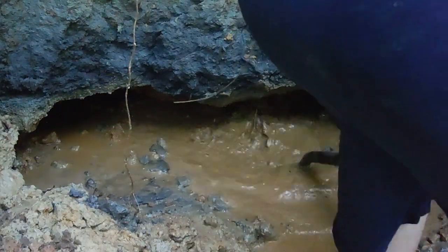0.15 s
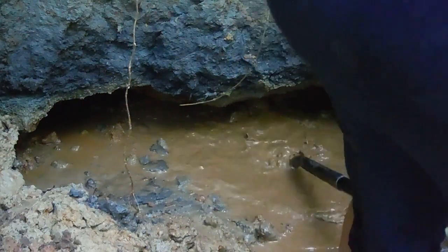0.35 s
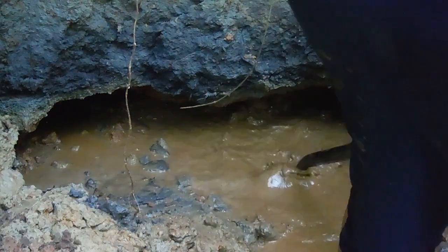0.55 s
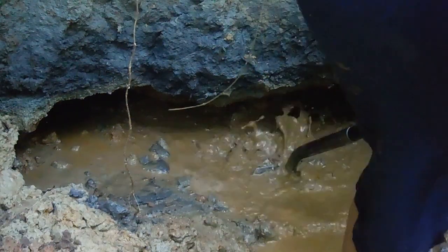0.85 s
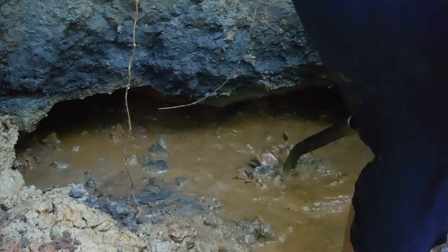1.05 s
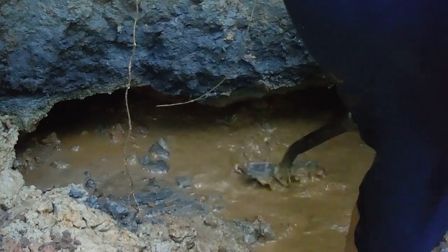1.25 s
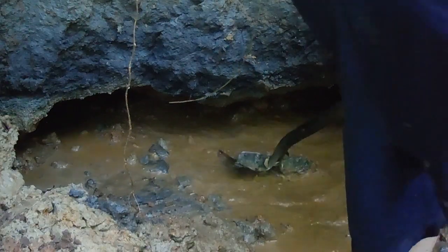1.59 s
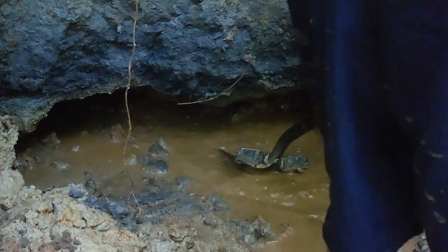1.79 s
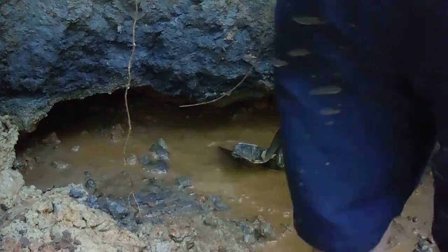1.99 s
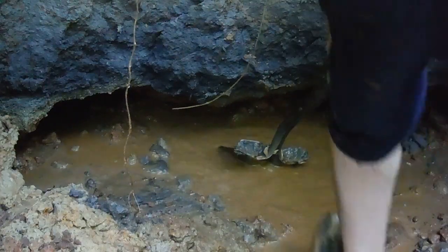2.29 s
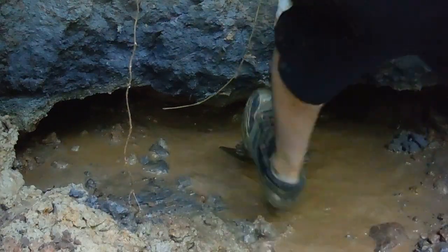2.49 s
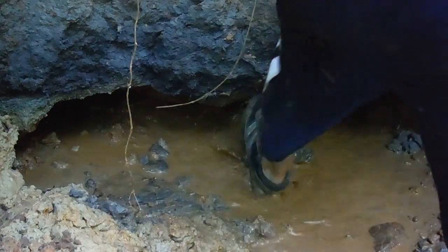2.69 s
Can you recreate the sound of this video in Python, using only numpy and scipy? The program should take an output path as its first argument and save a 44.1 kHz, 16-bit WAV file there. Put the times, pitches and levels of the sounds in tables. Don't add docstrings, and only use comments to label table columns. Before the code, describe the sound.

Close splashing in shallow muddy water, with dull knocks, trickling and a distant puttering pump engine

```python
import sys
import numpy as np
from scipy import signal
from scipy.io import wavfile
from scipy.ndimage import uniform_filter1d

SR = 44100
rng = np.random.default_rng(int(sys.argv[2]) if len(sys.argv) > 2 else 0)


def to_wav(s):
    ch = np.atleast_2d(s).T
    pcm = np.round(np.clip(ch, -1, 1) * 32767)
    wavfile.write(sys.argv[1], SR, pcm.astype(np.int16))


def rack_gain(trim_db):
    fader = np.asarray(trim_db, float)
    return 10 ** (fader / 20)


N = 125244


def rms_one(x):
    return x / np.sqrt(np.mean(x ** 2) + 1e-20)


def in_time(rows):
    return np.interp(np.arange(N) / SR, *np.transpose(rows))


def drift(rate_hz):
    r = np.exp(-2 * np.pi * rate_hz * 40 / SR)
    slow = signal.lfilter([1], [1, -2 * r, r * r], rng.standard_normal(N // 40 + 2002))
    slow = rms_one(slow[2000:])
    return np.interp(np.arange(N) / 40, np.arange(len(slow)), slow)


def ring(clicks, hz, t60_s):
    r = rack_gain(-60 / (t60_s * SR))
    w = 2 * np.pi * hz / SR
    return signal.lfilter([0, np.sin(w)], [1, -2 * r * np.cos(w), r * r], clicks + 1e-18)


def cut(x, hz, kind, order=2):
    return signal.sosfilt(signal.butter(order, hz, kind, fs=SR, output="sos"), x)


def grains(per_s, size_db):
    size = rack_gain(size_db * np.minimum(rng.exponential(1, N), 5)) * rng.choice([-1, 1], N)
    return size * (rng.random(N) < per_s / SR)


def rumble():
    air = rms_one(cut(rng.standard_normal(N), [30, 90], "band"))
    return rack_gain(-57 + 4.0 * drift(5.3)) * air


def exhaust(turns):
    # pitch_hz, level_db, t60_s
    exhaust_modes = [(140.6, -15, 0.087), (226.8, -22.5, 0.17), (459, -32, 0.15), (498, -18, 0.034),
                     (584, -27.5, 0.082), (379, -31, 0.043)]
    fires_at, spread_db, upper_lag_s = 0.25, 0.3, 0.003985
    lead = SR // 2
    firings = np.flatnonzero(np.diff(np.floor(turns + 1 - fires_at)))
    earlier = firings[0] - (firings[1] - firings[0]) * np.arange(1, 9)
    firings = np.r_[earlier, firings] + lead
    out = 0
    for k, (hz, db, t60_s) in enumerate(exhaust_modes):
        lag = int(upper_lag_s * SR) * (hz > 300)
        strength_db = spread_db * (4 + k / 2) * rng.standard_normal(len(firings))
        clicks = np.zeros(N + lead)
        clicks[np.minimum(firings + lag, N + lead - 1)] = -rack_gain(db + strength_db)
        out = out + ring(clicks, hz, t60_s)
    high_pass = signal.butter(3, 86.5, "high", fs=SR, output="sos")
    return signal.sosfiltfilt(high_pass, out)[lead:]


def valve(turns, firings_per_s):
    valve_at, tick_db, spread_db, fade_s = 0.63, -15.5, 5.2, 0.003
    since_s = ((turns - valve_at) % 1) / firings_per_s
    strength = rng.standard_normal(int(turns[-1]) + 2)
    strength = strength[np.floor(turns + 1 - valve_at).astype(int)]
    tick = rack_gain(tick_db + spread_db * strength) * np.exp(-since_s / fade_s)
    return tick * cut(rng.standard_normal(N), [3000, 8800], "band", order=3)


def engine():
    # start_s, firings_per_s
    speed_curve = [(0.0, 25.026), (0.22, 24.99), (0.44, 25.307), (0.66, 25.255), (0.87, 24.482),
                   (1.09, 24.331), (1.31, 24.681), (1.53, 25.492), (1.75, 24.493), (1.97, 24.902),
                   (2.18, 24.848), (2.4, 24.906), (2.62, 25.099), (2.84, 25.081)]
    # start_s, level_db
    load_curve = [
        (0, -0.5),
        (.6, 1),
        (1.4, 0.5),
        (2.3, -2.5),
        (2.84, 3),
    ]
    firings_per_s = in_time(speed_curve)
    turns = np.cumsum(firings_per_s) / SR
    shake = rack_gain(-33.5) * np.sin(4 * np.pi * (turns - 0.34))
    shake = shake + rack_gain(-48) * np.sin(2 * np.pi * turns)
    return rack_gain(in_time(load_curve)) * (exhaust(turns) + shake) + valve(turns, firings_per_s)


def trickle():
    # start_s, level_db
    flow_curve = [(0, -17.5), (.15, -17), (.33, -16), (.45, -15), (.62, -15), (.75, -17), (1.1, -16.5),
                  (1.2, -14), (1.33, -17), (1.6, -15.5), (1.8, -18.5), (1.97, -16.5), (2.1, -16),
                  (2.25, -18.5), (2.45, -20.5), (2.54, -18.5), (2.7, -12.5), (2.84, -15)]
    # band_hz, level_db (per Hz)
    trickle_colour = [(200, -7), (320, -12.5), (480, -1), (700, -16), (840, -4), (1000, -8), (3000, -8.5),
                      (9000, -9)]
    patchy_db, fizz_db, fizz_per_s, fizz_size_db, fizz_cycles = 0.88, -6, 900, 2.6, 9
    colour_hz, colour_db = np.transpose(trickle_colour)

    def colour(hz):
        return np.interp(np.log(hz), np.log(colour_hz), colour_db)

    wash = 0
    together = drift(14)
    band_edges = 200 * 2 ** np.arange(0, 6.5, 1 / 3)
    white = rng.standard_normal((2, N))
    for k, (low, high) in enumerate(zip(band_edges, band_edges[1:])):
        patches_db = patchy_db * (0.5 * together + drift(54))
        band = cut(white[k % 2], [low, high], "band")
        wash = wash + rack_gain(colour(np.sqrt(low * high)) + patches_db) * band

    clicks = grains(fizz_per_s * rack_gain(4.3 * together), fizz_size_db)
    dealt = rng.integers(0, 20, N)
    fizz = 0
    for k, hz in enumerate(np.geomspace(600, 9500, 20)):
        fizz = fizz + rack_gain(colour(hz)) * hz * ring(clicks * (dealt == k), hz, fizz_cycles / hz)
    water = rms_one(wash) + rack_gain(fizz_db) * rms_one(fizz)
    return rack_gain(in_time(flow_curve)) * cut(water, 9630, "low", order=4)


def drops():
    # start_s, level_db (peak)
    drop_rows = [(0.124, -3), (0.383, -4), (0.6493, -5), (0.9561, -4.5), (1.0719, -2), (1.091, -8),
                 (1.3507, -23), (1.3786, -10), (1.4405, -11), (1.667, -6), (1.95, -19), (2.1363, -1),
                 (2.224, -16), (2.2337, -12), (2.336, -6), (2.4004, -5.5), (2.475, -10), (2.65, -7),
                 (2.7022, -5), (2.7351, -2)]
    out = np.zeros(N)
    fade = np.exp(-np.arange(800) / SR / 0.0043)
    for start_s, db in drop_rows:
        i = int(start_s * SR)
        tick = cut(fade * rng.standard_normal(800), [3000, 9500], "band", order=3)
        out[i:i + 800] += rack_gain(db - 1) * tick
    return out


def knocks():
    # start_s, level_db, pitch_hz
    knock_rows = [(.49, -24, 320), (.565, -24, 180), (.68, -26, 70), (.685, -22, 170), (1.002, -23, 70),
                  (1.008, -13, 135), (1.012, -19, 300), (1.262, -35, 90), (1.272, -19, 610),
                  (1.272, -22, 290), (1.543, -29, 70), (1.907, -22, 340), (2.612, -19, 65),
                  (2.611, -14, 200), (2.616, -9, 150), (2.622, -12, 240), (2.626, -11, 360),
                  (2.638, -13, 380), (2.685, -29, 60)]
    trim_db, fade_cycles = 6.5, 1.03
    out = np.zeros(N + SR)
    u = np.arange(SR // 10) / SR
    for start_s, db, hz in knock_rows:
        i = int(start_s * SR)
        push = 2 * np.sin(2 * np.pi * hz * u) * u * hz * np.exp(-u * hz / fade_cycles)
        out[i:i + len(u)] += rack_gain(db + trim_db) * push
    return out[:N]


def pockets():
    # middle_s, half_length_s, level_db, pitch_hz
    pocket_rows = [(.4, 0.0055, -18, 3250), (.165, .012, -30, 370), (0.202, 0.0097, -24, 1700),
                   (0.267, 0.0091, -17.5, 1777), (.268, 0.0091, -21, 860), (.635, .03, -24, 480),
                   (.66, 0.011, -20, 1240), (.668, 0.025, -20, 2700), (0.698, 0.011, -21.5, 610),
                   (1, .016, -20.5, 860), (0.91, 0.0059, -19.5, 2400), (.985, 0.012, -19.5, 1320),
                   (1.005, 0.013, -17, 1660), (1.008, 0.017, -22, 3000), (1.047, 0.0057, -16, 1290),
                   (1.222, 0.008, -14, 1600), (1.232, 0.0088, -13.5, 2000), (1.226, 0.0051, -14, 2500),
                   (1.228, 0.0083, -15, 3000), (1.225, 0.015, -19, 3600), (1.271, 0.007, -7, 1180),
                   (1.274, 0.0095, -11, 1570), (1.272, 0.0072, -4.5, 2180), (1.272, 0.0072, -10.5, 3140),
                   (1.26, 0.0053, -20, 3300), (1.458, 0.0096, -16, 2080), (1.473, 0.0062, -13, 2770),
                   (1.462, 0.011, -20, 4000), (1.548, 0.005, -10, 2530), (1.592, 0.0088, -21.5, 860),
                   (1.59, .01, -25, 455), (.93, 0.049, -28, 506), (1.67, 0.03, -24.5, 470),
                   (1.66, 0.013, -23, 870), (1.672, 0.016, -25, 1120), (1.74, 0.0089, -27, 800),
                   (1.848, 0.019, -20, 830), (1.895, 0.027, -23, 790), (1.845, 0.034, -21, 690),
                   (1.83, 0.049, -26, 400), (1.868, 0.015, -23, 1450), (1.91, 0.013, -19.5, 455),
                   (2.118, 0.02, -21.5, 800), (2.13, 0.01, -21.5, 345), (2.143, .008, -15, 2000),
                   (2.145, 0.011, -24, 3000), (2.177, 0.0067, -18, 3700), (2.174, .006, -15, 2140),
                   (2.185, 0.004, -14.5, 1740), (2.492, 0.0061, -21, 510),
                   (2.565, 0.0072, -24, 1940), (2.596, 0.0061, -9.5, 2100), (2.596, 0.0038, -9, 3400),
                  (2.597, .005, -17, 1800), (2.618, 0.0057, -9, 4100), (2.627, 0.0075, 1, 1570),
                  (2.633, .011, -4, 1300), (2.631, .011, -7, 920), (2.626, 0.0065, -5, 2060),
                  (2.63, 0.01003, -15.5, 490), (2.4, 0.01506, -16.5, 620), (2.145, 0.0092, -15, 6100),
                  (2.178, .008, -13.5, 5300), (1.655, .035, -26.5, 330), (1.66, .04, -28.5, 750),
                  (1.72, .04, -30.5, 480), (2.652, .015, -16, 360), (2.665, 0.0092, -19, 1150),
                  (2.71, .007, -17, 4200), (2.78, .004, -17, 3100)]
    bubbles_per_s, ring_cycles, octaves, rise = 1000, 7, 0.28, 0.002
    out = np.zeros(N + SR)
    t = np.arange(int(0.12 * SR)) / SR - 0.05
    for middle_s, half_s, db, hz in pocket_rows:
        many = int(np.clip(2 * half_s * bubbles_per_s * hz / 1000, 10, 40))
        jitter, tone, size = rng.random((3, many, 1))
        when = (np.arange(many)[:, None] + jitter) / many * 2 - 1
        bubble_hz = hz * 2 ** (octaves * (tone - 0.55))
        cycles = np.clip(t - half_s * when, 0, None) * bubble_hz
        waves = np.sin(2 * np.pi * cycles * (1 + rise * cycles / 2))
        waves = waves * np.exp(-cycles / ring_cycles) * (1 - np.exp(-cycles))
        burst = np.sum(waves * rack_gain(-8.0 * size) * np.exp(-when ** 2), axis=0)
        i = int((middle_s - 0.05 - ring_cycles / hz / 2) * SR)
        out[i:i + len(burst)] += rack_gain(db) * burst / np.sqrt(np.sum(burst ** 2) / (2 * half_s * SR))
    return out[:N]


def sprays():
    # peak_s, rise_s, fall_s, level_db, low_edge_hz
    spray_rows = [(.085, 0.023, 0.071, -15.5, 1120), (0.24, 0.031, 0.022, -12.5, 1460),
                  (.262, .002, 0.023, -6, 830), (.461, 0.00073, 0.0069, -15.5, 3450),
                  (0.546, .015, 0.0091, -16, 4300), (.575, 0.009, 0.0086, -14, 2000),
                  (0.654, 0.013, 0.025, -11.5, 850), (0.684, 0.0067, 0.0066, -10, 990),
                  (.9, 0.042, 0.044, -15.5, 980), (1.01, 0.022, 0.019, -5, 716),
                  (1.227, 0.016, 0.032, -8, 1390), (1.268, 0.002, 0.026, -11, 1000),
                  (1.446, 0.022, 0.0067, -11, 2440), (1.459, .006, 0.0069, -11, 2200),
                  (1.473, 0.0085, 0.017, -10, 2380), (1.549, 0.021, 0.029, -11.5, 1946),
                  (1.675, 0.0052, 0.01, -13, 1980), (1.738, .004, 0.006, -11.5, 3600),
                  (1.87, 0.031, 0.03, -14.5, 1330), (1.904, .002, 0.0089, -7, 2020),
                  (2.125, .012, 0.0071, -15, 2500), (2.141, 0.006, 0.027, -7, 1690),
                  (2.174, 0.008, 0.011, -5.5, 1640), (2.565, 0.014, 0.03, -17, 1610),
                  (2.593, 0.0008, 0.015, -4, 1600), (2.616, 0.0025, 0.021, 1.5, 1410)]
    out = np.zeros(N)
    t = np.arange(N) / SR
    rain = rms_one(cut(grains(11000, 2.3), 8640, "low"))
    for peak_s, rise_s, fall_s, db, edge_hz in spray_rows:
        part = slice(max(int((peak_s - 0.09) * SR), 0), int((peak_s + 0.09) * SR))
        from_peak = t[part] - peak_s
        shape = np.exp(-np.where(from_peak < 0, -from_peak / rise_s, from_peak / fall_s) ** 1.5)
        sheet = shape * cut(rain[part], edge_hz, "high", order=4)
        out[part] += rack_gain(db) * sheet * np.sqrt(np.sum(shape ** 2) / np.sum(sheet ** 2))
    return out


def scene():
    far = rumble() + engine() + trickle()
    near = drops() + knocks() + pockets() + sprays()
    return np.tile(far + near, (2, 1))


def capsule(x):
    # pitch_hz, width_hz, lift (negative is a dip)
    capsule_modes = [(4130, 490, 0.6), (7530, 1630, 0.93), (5670, 1570, -0.43), (829, 14, 0.8),
                     (2050, 75, 0.36)]
    for hz, width_hz, lift in capsule_modes:
        r = np.exp(-np.pi * width_hz / SR)
        poles = [1, -2 * r * np.cos(2 * np.pi * hz / SR), r * r]
        x = x + lift * signal.lfilter(np.array([1, 0, -1]) * (1 - r * r) / 2, poles, x)
    return cut(x, 8820, "low") + rack_gain(-43.5) * rng.standard_normal(N)


def duck(x):
    knee_db, share, recover_db_per_s, smooth_s = -13.5, 0.53, 32, 0.018
    loudness_db = 10 * np.log10(np.maximum(uniform_filter1d(x ** 2, size=400), 1e-9))
    climb_db = recover_db_per_s * np.arange(N) / SR
    held_db = np.maximum.accumulate(loudness_db + climb_db) - climb_db
    over_db = np.maximum(held_db - knee_db, 0)
    r = np.exp(-1 / (smooth_s * SR))
    return x * rack_gain(-share * signal.lfilter([1 - r], [1, -r], over_db))


def top_cut(x):
    return signal.sosfilt(signal.butter(12, 15690, fs=SR, output="sos"), x)


def record(dry):
    x = duck(capsule(dry[0]))
    x = x / (1 + np.abs(x / 0.93) ** 6) ** (1 / 6)
    x = signal.sosfilt(signal.ellip(10, 0.5, 45, 15720, fs=SR, output="sos"), x)
    return top_cut(np.tile(x, (2, 1)))


dry = scene()
out = record(dry)
to_wav(out)
```